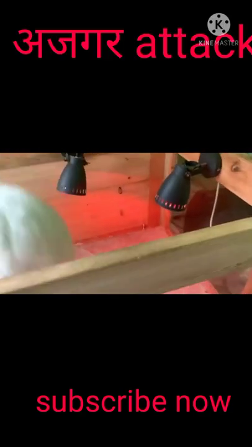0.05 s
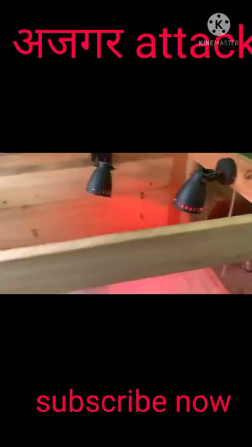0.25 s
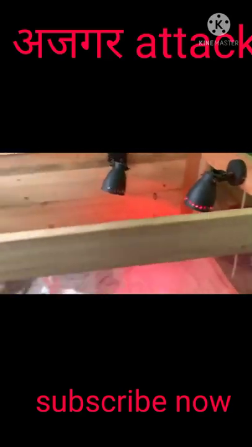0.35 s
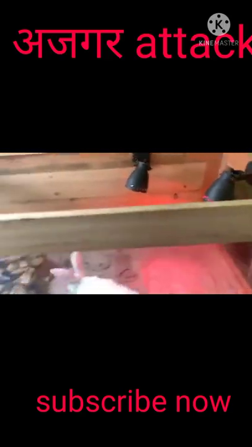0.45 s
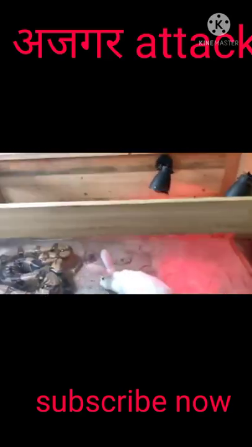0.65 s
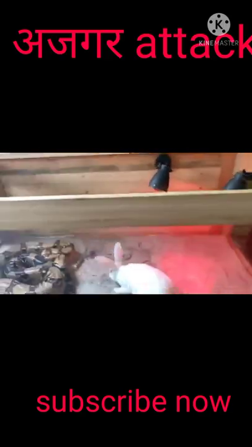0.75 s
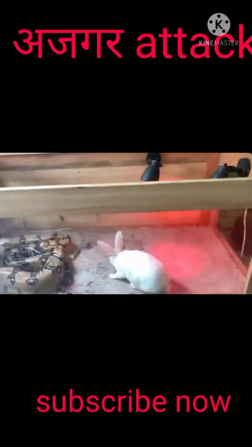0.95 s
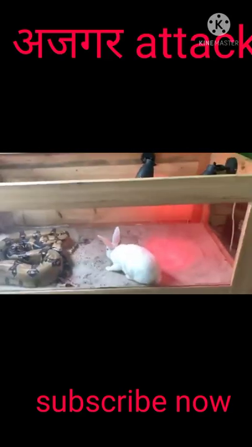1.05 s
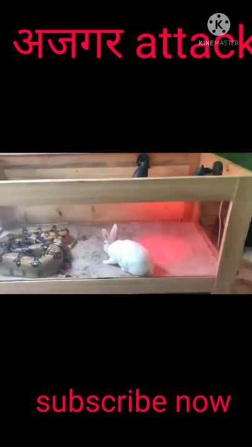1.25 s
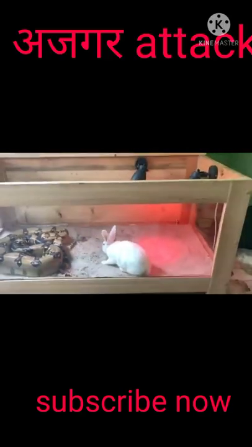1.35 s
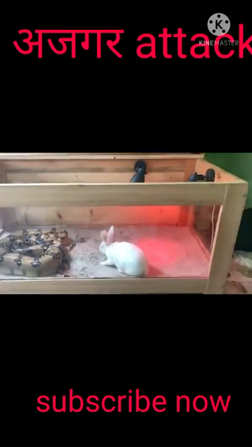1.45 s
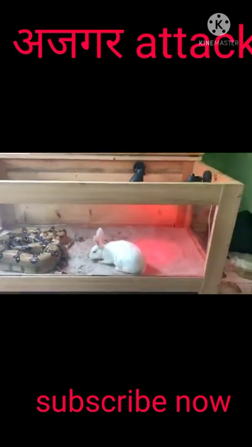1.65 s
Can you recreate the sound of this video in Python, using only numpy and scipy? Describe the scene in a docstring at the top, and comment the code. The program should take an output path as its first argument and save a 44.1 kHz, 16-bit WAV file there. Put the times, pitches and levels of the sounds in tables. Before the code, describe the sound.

Wooden boards are knocked and thumped in quick succession, ringing briefly in a small, quiet room. Afterwards clothes rustle faintly, light taps sound and a shoe scuffs the floor, over low bumps and rumble from a handheld microphone.

```python
"""A wooden animal pen takes a hard knock, then a heavy, gritty thump, in a small room.
Each blow makes a burst of noise (the crack) and sets the boards ringing with fading tones.
Someone holding a camera steps back: dull bumps come through its body, clothes rustle and
a foot scuffs the floor, both rubbing sounds made of grainy noise. Light taps and one faint
clink are heard too, over the rumble of the hand and quiet room air."""
import sys
import numpy as np
from scipy import signal
from scipy.fft import rfft, irfft, next_fast_len
from scipy.io import wavfile
from scipy.ndimage import map_coordinates

SR = 44100
rng = np.random.default_rng(int(sys.argv[2]) if len(sys.argv) > 2 else 0)


def wav_record(signal):
    """Record a signal, one row per channel, as 16-bit PCM in the file named by sys.argv[1]."""
    frames = np.transpose(np.atleast_2d(signal))
    bounded = np.clip(frames, -1, 1)
    # unit amplitude maps onto the largest positive 16-bit level
    quanta = np.round(bounded * 32767).astype(np.int16)
    wavfile.write(sys.argv[1], SR, quanta)


N = 74970

# A "fade" is the time a sound takes to drop 60 dB. "Pan" is how much louder it is on the left.
# Blows on the pen
# (time [s], ring level [dB], favoured pitch [Hz], crack level [dB], crack fade [s], pan [dB])
PEN_BLOWS = [(.1975, -27.5, 1990, -29, 0.052, 4), (0.206, -29.5, 770, -30.5, 0.078, 3.5),
             (.2245, -36, 1760, -36, 0.12, 4), (.282, -26.5, 383, -28.5, 0.031, 2.5),
             (0.286, -26.5, 325, -34, 0.071, 0), (.311, -34.5, 195, -33.5, 0.039, -9),
             (.329, -36.5, 278, -33, 0.15, 2.5), (.348, -43.5, 375, -37.5, 0.048, -1.5)]
# The tones the boards ring with (pitch [Hz], level [dB], fade [s])
BOARD_TONES = [(118.5, -1, .18), (157, 4.5, .2), (184.2, 6, 0.25), (230.4, -3, 0.29), (318.8, -6.5, 0.28),
               (360.2, 1, 0.19), (457, -1, 0.053), (484.5, 2, 0.2), (779, 2, 0.082), (885, -6.5, 0.18),
               (971, -3.5, 0.18), (1854, 3, 0.11), (1888, 1, 0.096), (2596.7, 1.5, 0.073)]
# Tone colour of the crack: how strong its lows and highs are (frequency [Hz], level [dB])
CRACK_COLOUR = [(50, -23), (110, -25), (200, 0.5), (800, 0.5), (1300, -6), (1950, -3), (2300, -5.5),
                (2700, -5), (3400, -11.5), (4400, -10), (5600, -17), (9000, -25), (14000, -21)]
# Bumps on the camera's body (time [s], level [dB], starting pitch [Hz], time to drop to 37% [s])
BODY_BUMPS = [(0.206, -37, 207, 0.044), (0.257, -29, 109, 0.029), (0.282, -30, 122, 0.027),
              (0.327, -33.5, 53, 0.066), (0.43, -34.5, 100, 0.019), (.535, -41, 71.3, 0.099),
              (0.658, -32, 133, 0.016), (0.713, -33.5, 153.8, 0.047), (1.011, -35.5, 165, 0.019),
              (1.062, -38, 118.4, 0.032), (1.115, -41.5, 109, 0.041), (1.407, -46, 92, 0.096),
              (1.52, -35.5, 123, 0.031), (1.586, -42.5, 75, 0.044), (1.654, -36, 95, 0.017)]
# Rubbing strokes of grit, clothes and a foot
# (start [s], rise [s], hold [s], time to drop 20 dB [s], level [dB], treble tilt [dB/octave], pan [dB])
GRIT_STROKES = [(.273, 0.004, 0.044, 0.04, -38.5, 0.0052, 1.2)]
CLOTH_STROKES = [(-.02, 0.024, 0.016, 0.1, -63.5, 0, 3), (.07, 0.14, 0.075, .03, -53.5, -3, 2),
                 (.44, 0.017, 0.045, 0.2, -66.5, 4, 6.5), (.65, 0.052, 0.015, 0.15, -66, 0, 3),
                 (.8, 0.12, 0.22, 0.16, -65, 0.5, 4), (.94, 0.031, 0.066, 0.15, -55, -1.5, -0.5),
                 (1.05, 0.023, 0.068, 0.36, -59, -0.5, 1.5), (1.18, 0.019, 0.023, 0.057, -54.5, 1.5, 1.5)]
FOOT_STROKES = [(1.343, 0.011, 0.024, 0.14, -53, 1, 0), (1.36, 0.033, 0.072, .09, -46, 0, 0.028)]
# Tone colours of those three surfaces (frequency [Hz], level [dB])
GRIT_COLOUR = [(200, 9), (900, -0.5), (2600, -6), (3200, -1.5), (4500, -10), (6500, -11.5), (10000, -9.5),
               (14000, -36)]
CLOTH_COLOUR = [(100, -16), (200, -10), (320, 0.5), (700, -5), (1400, -1), (2500, -7), (4500, -10),
                (8000, -21.5), (14000, -26)]
SOLE_COLOUR = [(100, -1.5), (330, -18), (520, -8), (850, -7), (1400, -1.5), (2000, -6), (2700, -4.5),
               (3500, -5), (5500, -10.5), (8000, -17.5), (14000, -21.5)]
# Pitches that stand out in the foot scuff (pitch [Hz], half width [Hz], boost [dB])
SOLE_PEAKS = [(1113, 37, 9.5), (1470, 51, -3.5), (2025, 110, 6.5), (2750, 50, 2.5), (3400, 160, 3.5),
              (4100, 190, 2)]
# Light taps (time [s], level [dB], pitch [Hz], half width [octaves], rise [s], fade [s])
LIGHT_TAPS = [(.178, -50.5, 1690, 0.44, .003, 0.053), (.458, -54, 5070, 3.2, 0.009, 0.18),
              (.500, -51, 252, 0.56, 0.0094, 0.069), (0.844, -61.5, 556, 0.25, .008, 0.18),
              (0.9, -57.5, 3270, 0.98, 0.0032, 0.12), (0.904, -58, 347, 0.93, 0.014, 0.32),
              (0.969, -43.5, 213, 0.42, 0.0093, .09), (1.112, -34.5, 352, 0.59, 0.0015, 0.036),
              (1.125, -48.5, 1860, 0.27, 0.0036, 0.063), (1.34, -42.5, 1390, 0.55, 0.0086, 0.12),
              (1.341, -49.5, 290, 0.88, 0.0096, 0.19)]
# The tones of a small hard object (pitch [Hz], level [dB], fade [s])
CLINK_TONES = [(2643, 11, 0.15), (3300, 16, 0.029), (4050, 14, 0.076), (5460, -16, 0.042)]
# How the hand's rumble swells and sinks (time [s], level change [dB])
HAND_MOTION = [(0, -2.5), (.08, -54), (.23, 2), (.31, 18.5), (.48, 9), (.62, 0.5), (.8, -6.5), (.89, -26),
               (1.001, 4.5), (1.148, 8.5), (1.299, -6), (1.449, 4), (1.7, -15)]
# Tone colours of the hand's rumble and the room air (frequency [Hz], level [dB])
HAND_COLOUR = [(20, -9), (45, 1), (85, -6), (160, -11.5), (300, -22), (700, -33), (3000, -66)]
AIR_COLOUR = [(25, 2), (60, 0.5), (120, -1.5), (200, -13), (400, -26.5), (2000, -17.5), (6000, -35.5),
              (14000, -32)]
# How long the room echoes (frequency [Hz], fade [s])
ROOM_FADES = [(80, 0.12), (300, 0.31), (1000, 0.47), (3000, 0.45), (8000, 0.36), (14000, 0.58)]
# How alike left and right are (frequency [Hz], likeness [1 = same, 0 = unrelated])
STEREO_LIKENESS = [(40, 0.18), (130, 0.87), (290, 0.71), (630, 0.35), (1400, 0.53), (9000, -.06)]


def pen_blows(attack_s=0.0012, focus_db_per_octave=7, crack_boost_db=6.5, boost_octaves=0.51):
    """Each blow cracks and rings the boards; the spot it hits favours tones near one pitch."""
    out = np.zeros((2, N))
    hz, tone_db, fade_s = np.transpose(BOARD_TONES)[:, :, None]
    spread = stereo_angle(hz)
    wander = 0.5 * np.array([wobble(per_s=130) for _ in BOARD_TONES])  # radians; roughens the tones
    for start, ring_db, favoured_hz, crack_db, crack_s, pan_db in PEN_BLOWS:
        t = since(start)
        phase = 2 * np.pi * hz * t + rng.uniform(0, 2 * np.pi, hz.shape) + wander
        shift = spread * rng.choice([-1, 1], hz.shape)
        off_pitch_db = focus_db_per_octave * np.abs(octaves(hz, favoured_hz))
        loudness = gain(ring_db + tone_db - off_pitch_db - 60 * t / fade_s)
        ring = np.array([(loudness * np.sin(phase + side * shift)).sum(0) / 2 for side in (1, -1)])
        boost = lambda f: crack_boost_db * np.exp(-(octaves(f, favoured_hz) / boost_octaves) ** 2)
        burst = noise(lambda f: look_up(CRACK_COLOUR, f) + boost(f))
        crack = gain(crack_db - 60 * t / crack_s) * burst
        out += pan(pan_db) * (ring + crack) * (1 - np.exp(-t / attack_s))
    return out


def body_bumps(end_hz=45.94, sag_s=0.0328, rise_s=0.0057):
    """Soft bumps travel through the camera's body: low tones that sag in pitch as they die away."""
    out = np.zeros(N)
    for start, db, start_hz, decay_s in BODY_BUMPS:
        t = since(start)
        cycles = end_hz * t + (start_hz - end_hz) * sag_s * (1 - np.exp(-t / sag_s))
        loudness = gain(db) * (1 - np.exp(-(t / rise_s) ** 2)) * np.exp(-t / decay_s)
        out += loudness * np.sin(2 * np.pi * cycles)
    return out


def rubbing(strokes, surface, peaks=(), grain_db=1):
    """Surfaces slide over each other: a grainy hiss swells, holds and dies with each stroke."""
    out = np.zeros((2, N))
    boost = lambda f: sum(db / (1 + ((f - hz) / width) ** 2) for hz, width, db in peaks)
    for start, rise_s, hold_s, release_s, db, tilt_db, pan_db in strokes:
        grains = gain(grain_db * wobble(per_s=700))
        hiss = noise(lambda f: look_up(surface, f) + boost(f) + tilt_db * octaves(f))
        swell = np.minimum(since(start) / rise_s, 1)
        fall = gain(db - 20 * since(start + rise_s + hold_s) / release_s)
        out += pan(pan_db) * normalise(grains * hiss) * swell * fall
    return out


def light_taps():
    """Small contacts each make a short burst of noise around one pitch."""
    out = np.zeros((2, N))
    for start, db, hz, width, rise_s, fade_s in LIGHT_TAPS:
        t = since(start)
        burst = noise(lambda f: -10 * np.log10(1 + (octaves(f, hz) / width) ** 6))
        out += gain(db - 60 * t / fade_s) * (1 - np.exp(-t / rise_s)) * burst
    return out


def clink(start_s=0.901, base_db=-65):
    """A small hard object rings briefly with a few high tones."""
    out = np.zeros((2, N))
    t = since(start_s)
    for hz, db, fade_s in CLINK_TONES:
        cycles = hz * t + rng.random((2, 1))
        out += gain(base_db + db - 60 * t / fade_s) * np.sin(2 * np.pi * cycles)
    return out * (t > 0)


def hand_rumble(base_db=-53):
    """The hand shifts on the camera, making a low noise that comes and goes."""
    motion_db = np.interp(since(0), *np.transpose(HAND_MOTION))
    return gain(base_db + motion_db) * noise(lambda f: look_up(HAND_COLOUR, f))


def room_air(level_db=-69.5):
    """The air in the room makes a quiet, steady noise."""
    return gain(level_db) * noise(lambda f: look_up(AIR_COLOUR, f))


def with_echo(sound, echo_db):
    """Add the room's echo, in which each frequency dies at its own speed."""
    hz, t, bands = signal.stft(noise(np.zeros_like), SR, nperseg=256)
    fading = gain(-60 * t / look_up(ROOM_FADES, hz)[:, None])
    tail = signal.istft(bands * fading, SR, nperseg=256)[1]
    echo = signal.fftconvolve(sound, tail / np.linalg.norm(tail[0]), axes=1)[:, :N]
    return sound + gain(echo_db) * echo


def noise(colour):
    """Stereo noise shaped by colour(frequency), in dB."""
    white = rng.standard_normal((2, N))
    split = lambda hz: [np.cos(stereo_angle(hz)), np.sin(stereo_angle(hz))]
    middle, side = filtered(white, lambda hz: gain(colour(hz)) * split(hz))
    return normalise(np.array([middle + side, middle - side]))


def stereo_angle(hz):
    """An angle in radians that grows as left and right become less alike."""
    return np.arccos(np.clip(look_up(STEREO_LIKENESS, hz), -1, 1)) / 2


def filtered(sound, response):
    """Multiply each frequency in a sound by response(frequency)."""
    size = next_fast_len(N + SR // 2)
    hz = np.fft.rfftfreq(size, 1 / SR)
    return irfft(rfft(sound, size) * response(hz), size)[..., :N]


def wobble(per_s):
    """A curve that joins per_s random points each second."""
    return map_coordinates(rng.standard_normal(N // 8), [np.arange(N) * per_s / SR], order=1)


def gain(db):
    """Turn decibels into a multiplier."""
    return 10 ** (np.asarray(db) / 20)


def pan(db):
    """Left and right multipliers, db decibels apart."""
    return gain([[db / 2], [-db / 2]])


def normalise(sound):
    """Scale a sound to an average power of 1."""
    return sound / np.sqrt(np.mean(sound ** 2) + 1e-20)


def look_up(table, hz):
    """Read between the rows of a (frequency, value) table, on an octave scale."""
    frequencies, values = np.transpose(table)
    return np.interp(np.log(hz + 1), np.log(frequencies + 1), values)


def since(start):
    """Seconds since the start, zero before it."""
    return np.maximum(np.arange(N) / SR - start, 0)


def octaves(hz, centre_hz=1000):
    """How many octaves hz lies above the centre."""
    return np.log2((hz + 1) / centre_hz)


def scene():
    """The pen and the small movements echo in the room; the bumps reach the microphone directly."""
    pen = with_echo(pen_blows() + rubbing(GRIT_STROKES, GRIT_COLOUR), echo_db=-2)
    clothes = rubbing(CLOTH_STROKES, CLOTH_COLOUR)
    foot = rubbing(FOOT_STROKES, SOLE_COLOUR, SOLE_PEAKS)
    movements = with_echo(clothes + foot + light_taps() + clink(), echo_db=-10)
    return pen + body_bumps() + movements + room_air() + hand_rumble()


def record(dry):
    """The camera cuts the deepest rumble and the highest treble."""
    low_hz, top_hz = 30, 14600
    return filtered(dry, lambda hz: (hz < top_hz) / np.sqrt(1 + (low_hz / (hz + 1)) ** 10))


dry = scene()
out = record(dry)
wav_record(out)
```